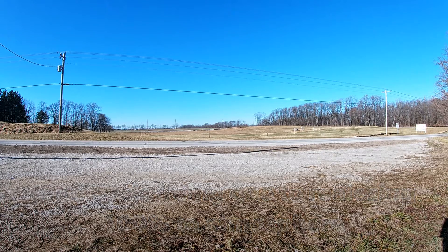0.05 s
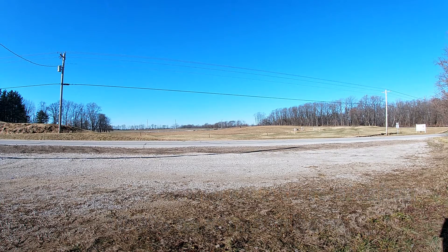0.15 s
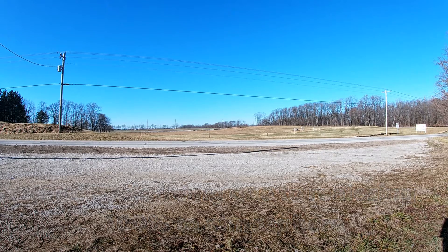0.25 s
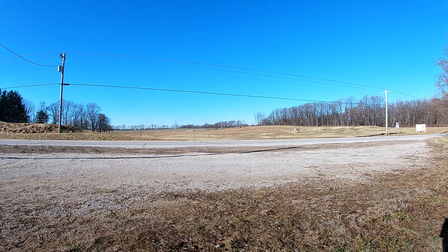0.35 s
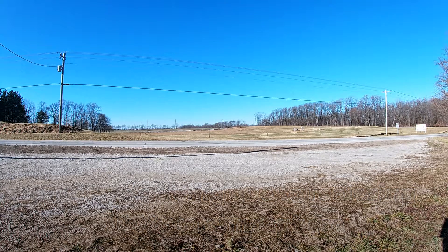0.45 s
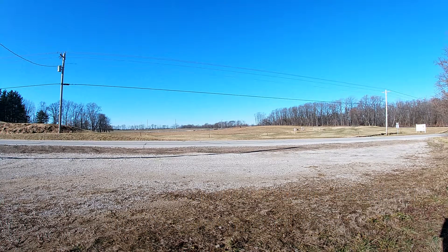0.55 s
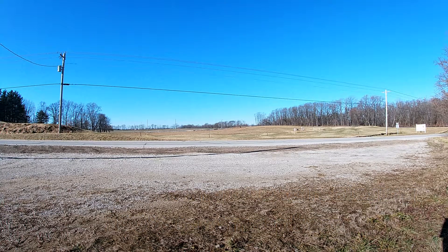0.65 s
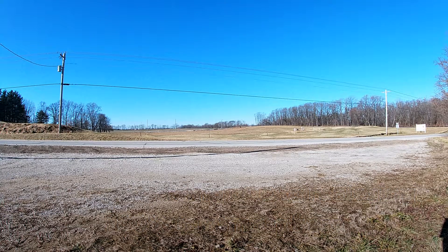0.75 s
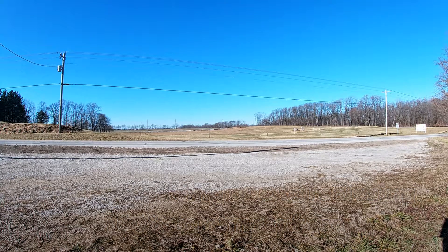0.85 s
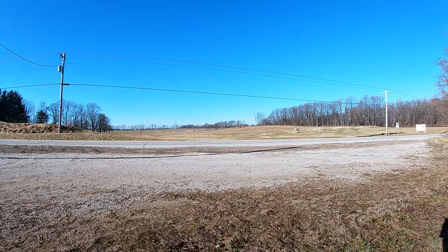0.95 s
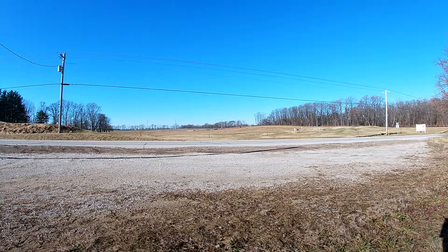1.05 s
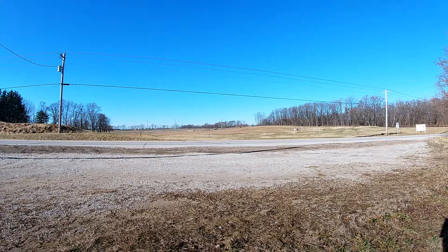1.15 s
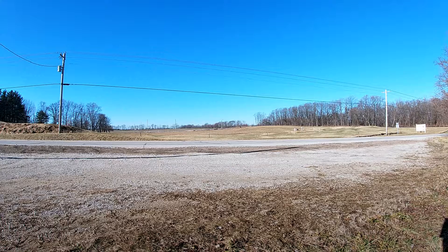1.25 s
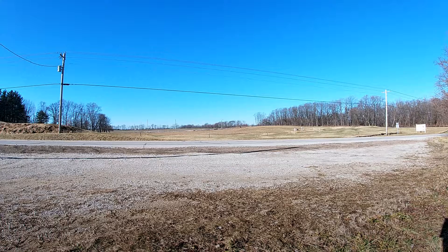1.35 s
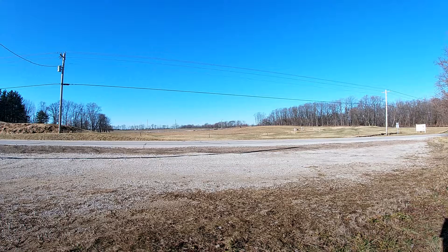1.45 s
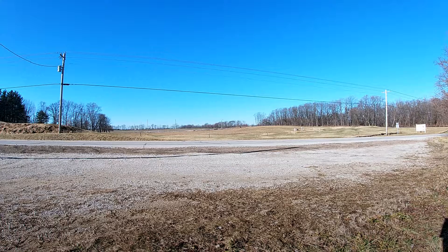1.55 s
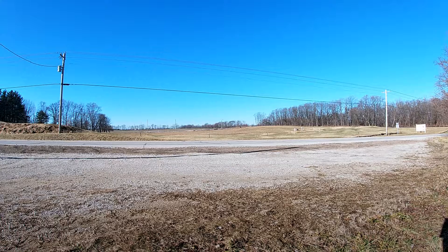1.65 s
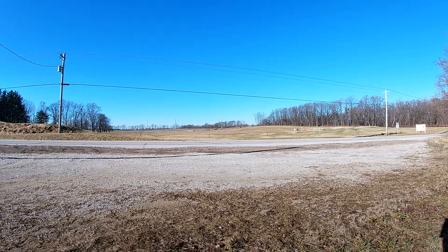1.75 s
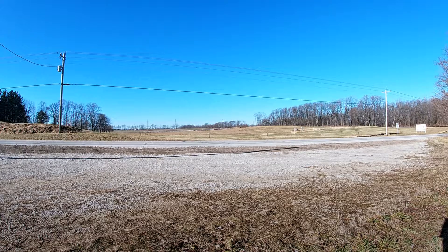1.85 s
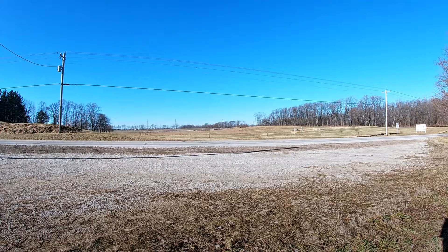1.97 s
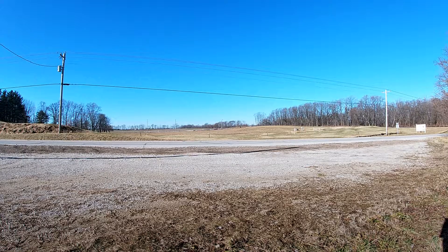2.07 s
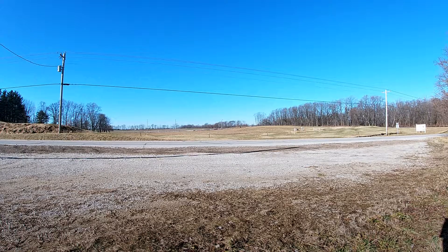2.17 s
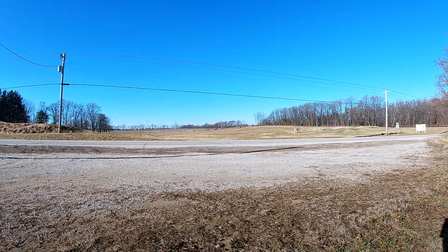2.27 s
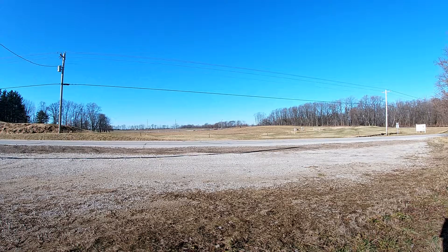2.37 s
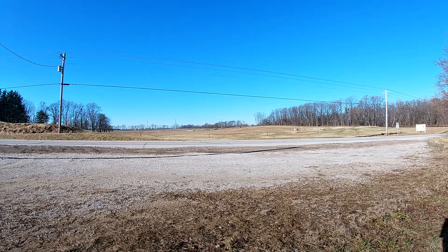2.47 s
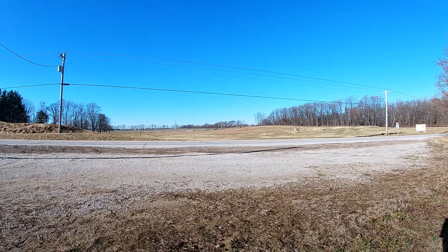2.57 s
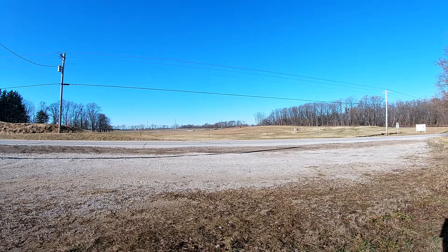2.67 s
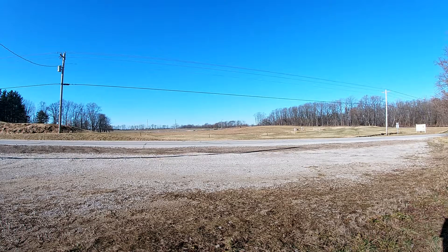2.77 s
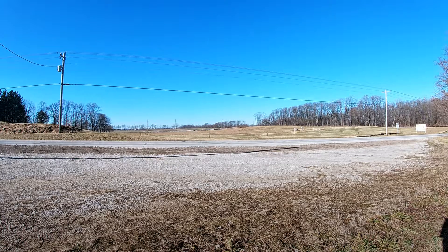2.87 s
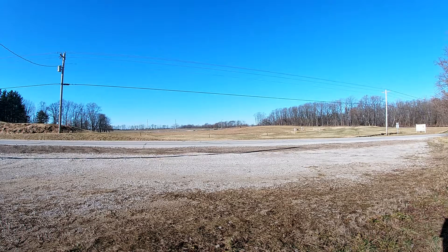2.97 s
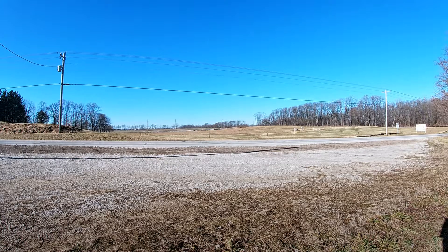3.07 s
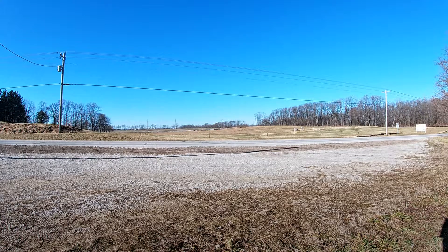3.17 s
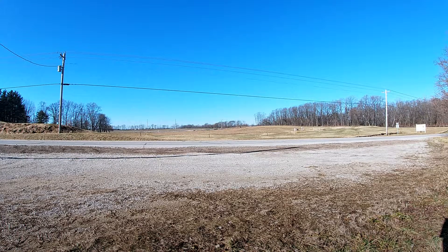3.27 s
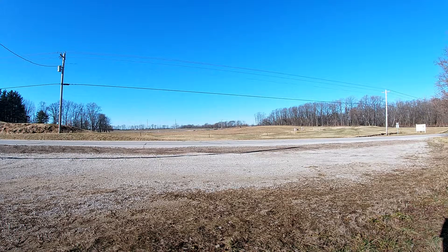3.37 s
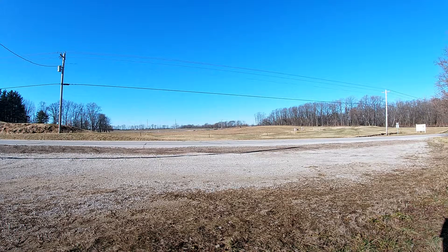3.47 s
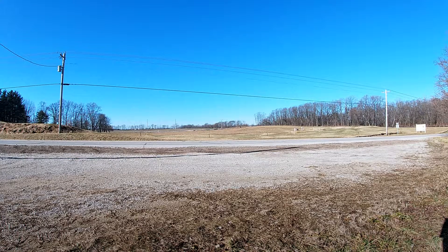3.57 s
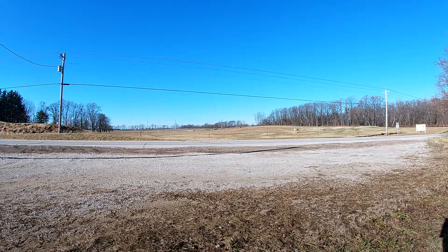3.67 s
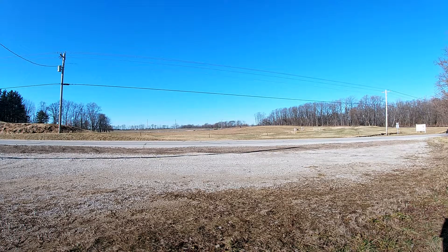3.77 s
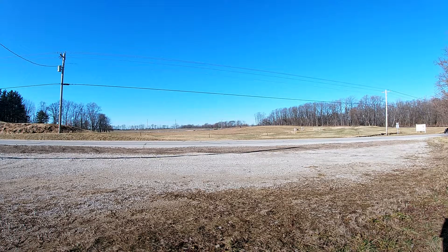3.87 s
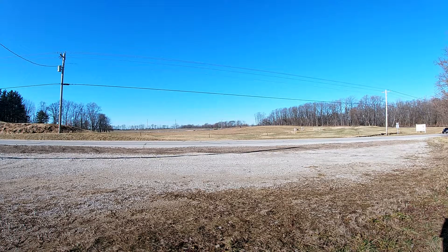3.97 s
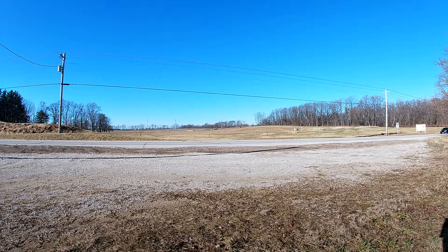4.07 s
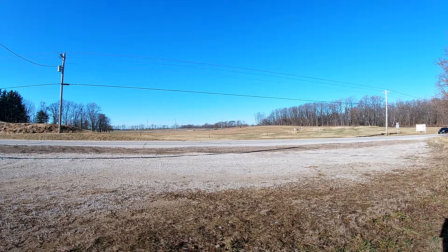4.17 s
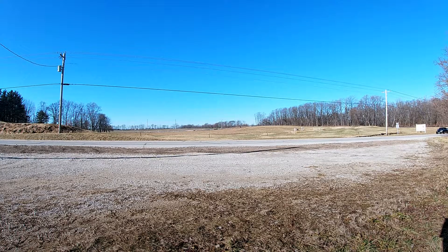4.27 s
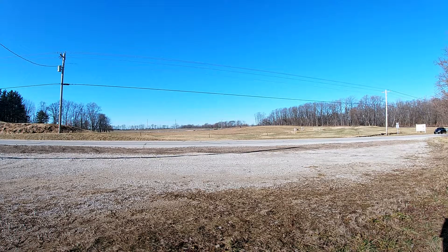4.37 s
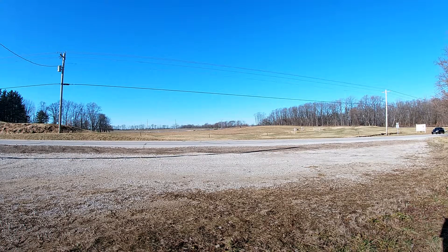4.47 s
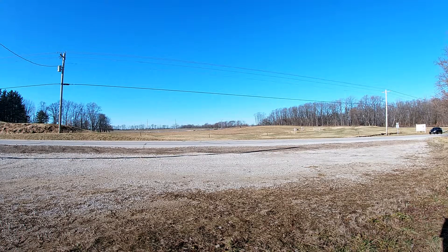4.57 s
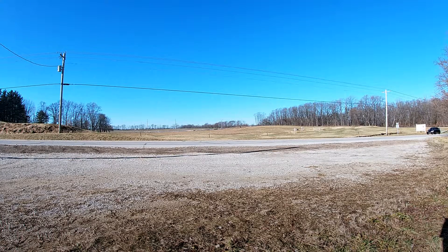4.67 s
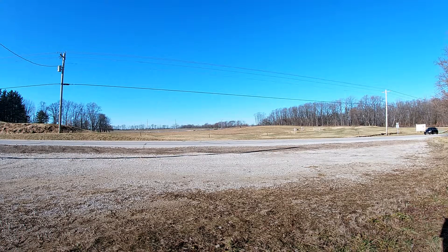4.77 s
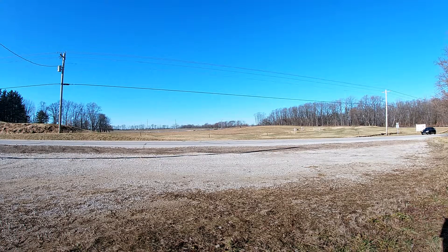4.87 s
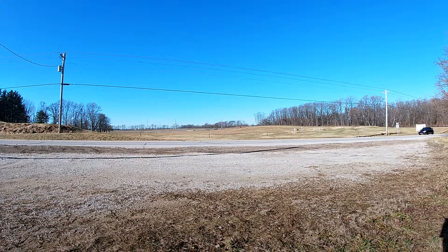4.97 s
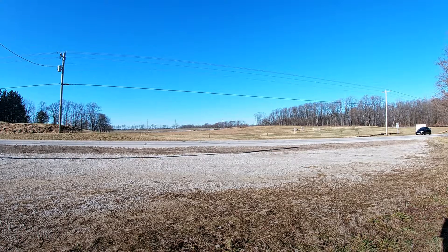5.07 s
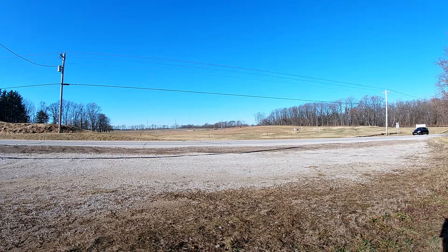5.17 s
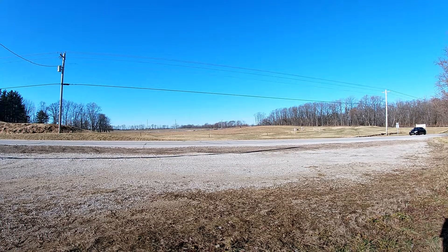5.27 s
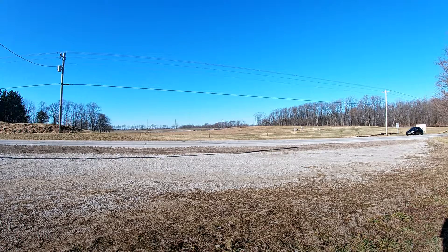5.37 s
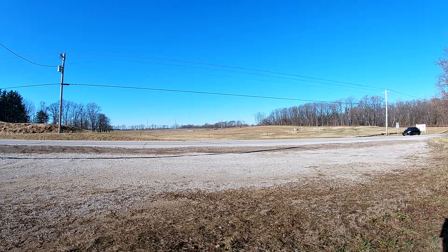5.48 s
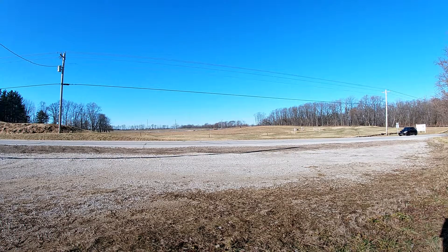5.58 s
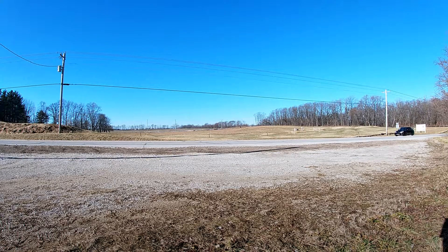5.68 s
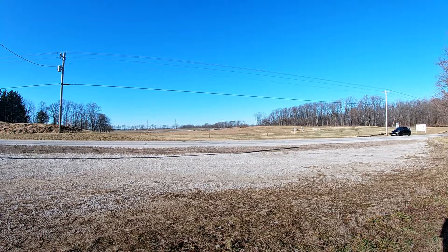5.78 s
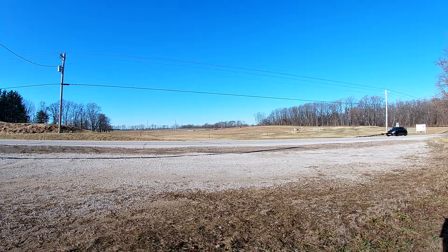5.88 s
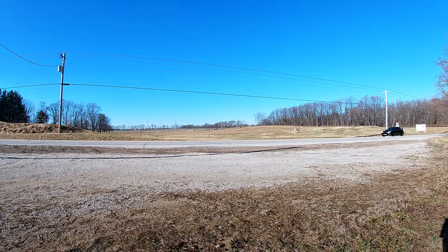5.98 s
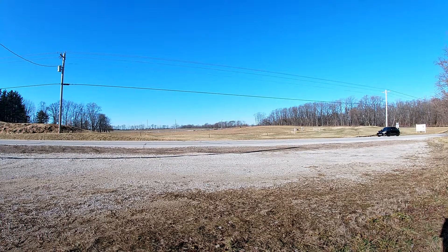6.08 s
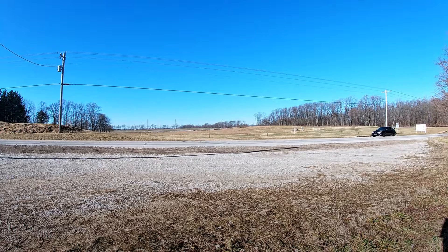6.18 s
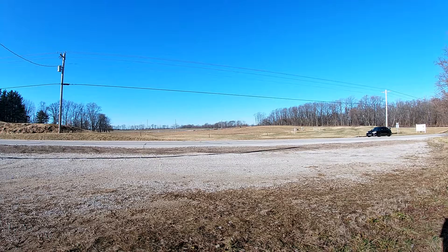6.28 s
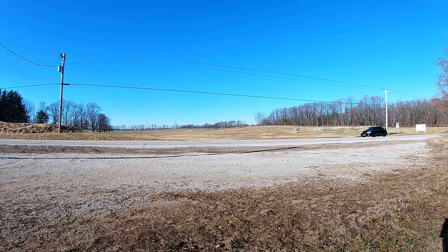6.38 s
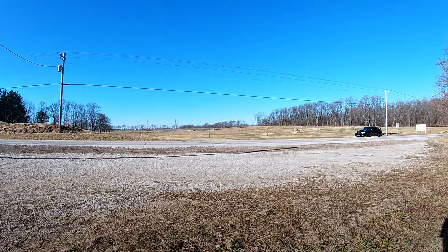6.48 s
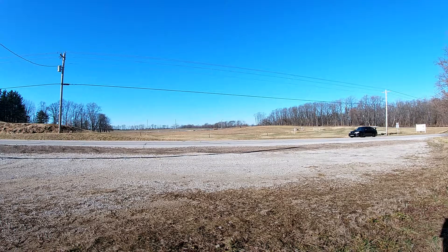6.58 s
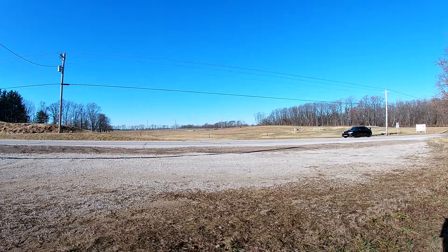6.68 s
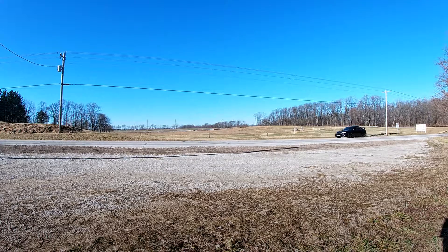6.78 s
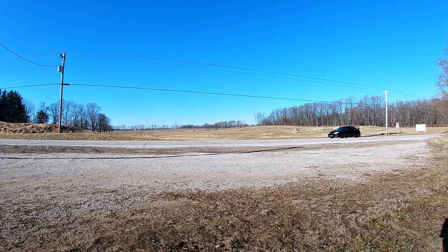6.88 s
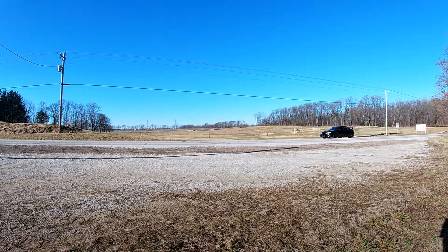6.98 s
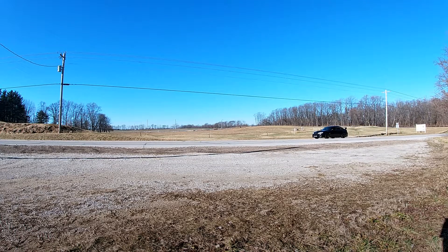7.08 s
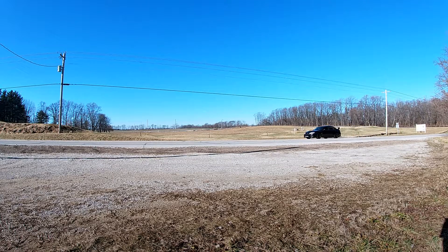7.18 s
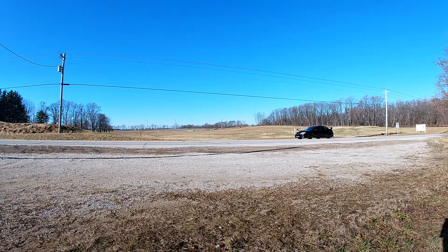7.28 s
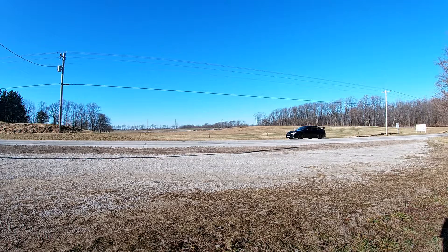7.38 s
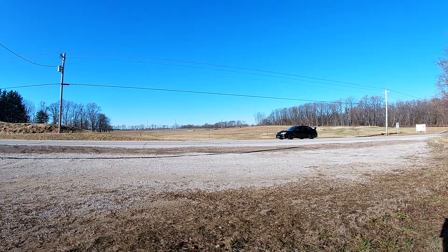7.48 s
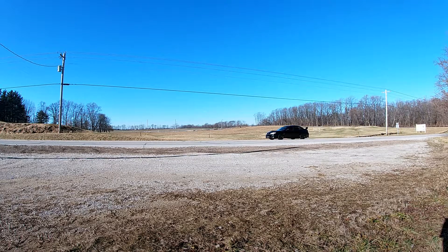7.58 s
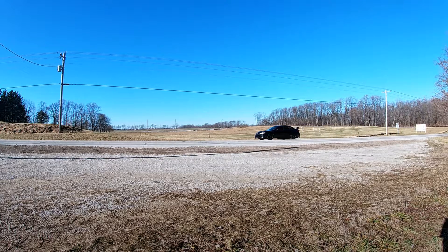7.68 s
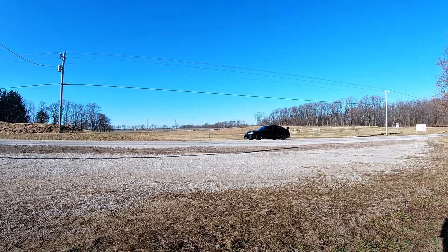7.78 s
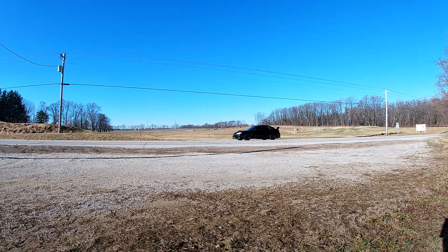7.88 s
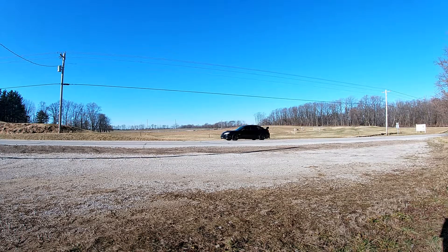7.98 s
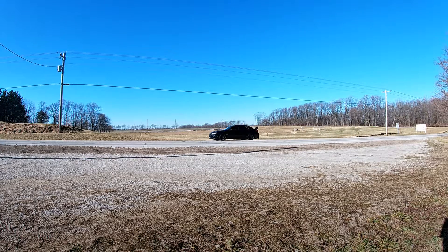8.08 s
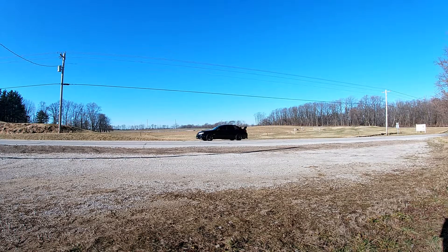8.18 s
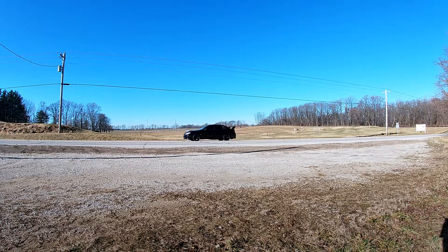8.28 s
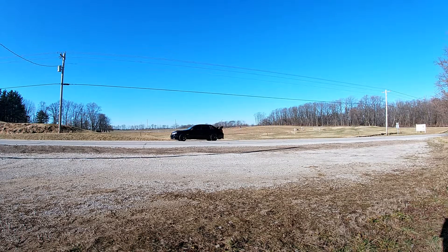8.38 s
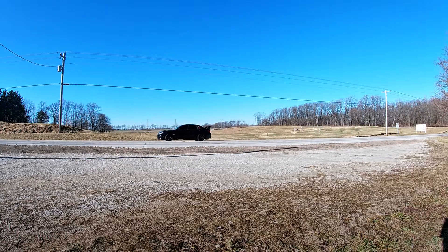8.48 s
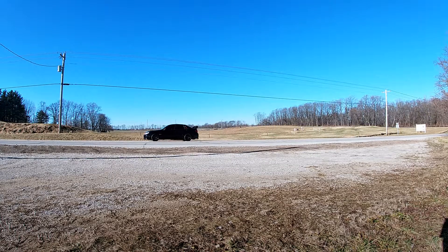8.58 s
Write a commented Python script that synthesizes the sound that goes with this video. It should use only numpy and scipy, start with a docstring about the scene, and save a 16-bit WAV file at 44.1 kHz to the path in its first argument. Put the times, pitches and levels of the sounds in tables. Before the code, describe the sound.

Breezy roadside; a raspy four-cylinder engine draws nearer, whooshing and burbling, blipping its revs, then firing three loud backfires trailed by short hisses.

```python
"""On the verge of a country road, a turbocharged four-cylinder car comes nearer.
Far off it lifts twice with a whoosh and a burble, holds a light throttle, blips down a gear and coasts on.
Three sharp exhaust bangs go off, each trailed by hissing air, over growing tyre and tailpipe noise.
Engine tones and gas puffs follow the crank; bangs and pops are struck resonances with noise;
air, tyres and breeze are coloured noise."""
import sys
import numpy as np
from scipy import signal
from scipy.fft import rfft, irfft, next_fast_len
from scipy.io import wavfile

SR = 44100
rng = np.random.default_rng(int(sys.argv[2]) if len(sys.argv) > 2 else 0)


def unload_wav(signal):
    """Save mono or channel-first audio to the path in sys.argv[1] as 16-bit WAV at rate SR, clipped to [-1, 1]."""
    wavfile.write(
        sys.argv[1],
        SR,
        np.round(np.clip(np.atleast_2d(signal).T, -1, 1) * 32767).astype(np.int16),
    )


N = 381024
TIME = np.arange(N) / SR
HZ = np.maximum(np.fft.rfftfreq(N, 1 / SR), 1)

# All levels are relative: later mixing steps can shift them.
# Breeze, low and lumpy: (time [s], level [dB])
BUFFETING = [(0,-63),(.6,-42.5),(1.0,-50.5),(1.7,-43.5),(2.2,-51.5),(3.9,-52),(4.7,-40.5),(5.8,-38),(6.2,-42),(6.6,-38),(7.2,-36.5),(7.8,-37.5),(8.64,-39.5)]
# Single gusts that thud on the microphone: (time [s], level [dB])
GUSTS = [(.63,-32),(1.59,-36),(1.735,-24),(4.87,-17.5),(5.25,-25),(5.48,-29.5),(6.35,-23.5),(7.17,-35.5),(8.15,-20),(8.49,-28)]
# Colour of the breeze and of the puffs under pops: (frequency [Hz], density [dB per Hz])
RUMBLE_COLOUR = [(10,-12),(22,-4.5),(40,-6.5),(70,-3.5),(110,-5),(180,-9),(300,-28.5)]
# Colour of the faint open-air hush: (frequency [Hz], density [dB per Hz])
HUSH_COLOUR = [(350,9),(700,0.5),(1500,-6),(3000,-20.5),(6000,-33.5),(7500,-40.5)]
# Tyres and gas flow: (time [s], tyre level [dB], tailpipe hiss level [dB])
ROAD_LEVELS = [(0,-49.5,-81),(1.5,-50,-78),(3,-44.5,-65.5),(3.9,-41.5,-55.5),(4.5,-40,-56.5),(5.3,-40,-56),(6.75,-40.5,-52),(7.4,-35.5,-48),(7.9,-41.5,-52.5),(8.25,-40,-48.5),(8.64,-37,-48.5)]
# Colour of the tyre roar: (frequency [Hz], density [dB per Hz])
TYRE_COLOUR = [(250,8),(325,15),(375,4.5),(450,10.5),(545,9),(690,-23.5),(835,-4.5),(945,-9.5),(1200,-6),(1450,-7.5),(1850,-8),(2200,-15),(3200,-22.5),(6000,-53.5)]
# Colour of the intake roar: (frequency [Hz], density [dB per Hz])
INTAKE_COLOUR = [(720,-23),(835,1),(950,-12.5),(1110,0.5),(1280,-3.5),(1420,-11),(1700,-23)]
# Loudness of the intake roar: (time [s], level [dB])
INTAKE_LEVEL = [(0,-66),(1.65,-64),(1.85,-47),(2.2,-51.5),(3,-64.5),(4,-50.5),(4.6,-48.5),(6,-51.5),(6.7,-55.5),(7.3,-47),(8,-58.5),(8.64,-52)]

# Blow-off valve openings: (time [s], level [dB], held open [s], fall [dB/s], first treble corner [Hz])
BLOW_OFFS = [(.235,-48.5,0.18,48,4020),(1.712,-39.5,0.11,26,3620),(5.468,-27.5,0.053,83,6010),(6.32,-30,0.11,111,6960),(7.476,-32,0.17,110,6330)]
# Whooshes back off the trees: (time [s], level [dB], rise [s], half-life [s], first treble corner [Hz])
WASHES = [(.34,-33,0.059,0.18,3750),(1.955,-30,0.045,0.22,3170)]
# Colour of the escaping boost air: (frequency [Hz], density [dB per Hz])
AIR_COLOUR = [(220,-10.5),(320,12.5),(385,3),(480,13),(570,7.5),(680,2.5),(900,-5),(1200,1),(1700,-6),(2400,-11.5),(3600,-7),(5000,-11),(6400,-15),(7600,-23),(10000,-27.5),(11500,-37),(14000,-34.5)]

# Dull pops deep in the exhaust: (time [s], level [dB], pitch [Hz])
POPS = [(0.241,-9,213),(.268,-16.5,164),(0.328,-12.5,158.3),(0.409,-15.5,160.3),(0.674,-15.5,179),(1.059,-12,174.4),(1.084,-12,138),(1.094,-14.5,251),(1.314,-24.5,70.7),(1.723,-23,422),(1.738,-10.5,307),(1.755,-28.5,129.4),(1.79,-15.5,193.3),(1.809,-20,121.3),(1.83,-21,150.4),(1.869,-22,143.4),(1.928,-19.5,197),(1.957,-18.5,173),(1.982,-17,81.3),(3.425,-7.5,263),(4.788,-17,102)]
# Bangs, two faint then three sharp: (time [s], crack level [dB], crack length [s],
# thump level [dB], thump pitch [Hz], squeal level [dB], squeal pitch [Hz])
BANGS = [(0.233,-48,0.0093,-20,523,-46.5,1580),(1.716,-42.5,0.031,-20.5,474,-37,1411),(5.47,-28,0.044,-5,525,-42.5,3450),(6.325,-24,0.022,-4.5,465.5,-38,3600),(7.49,-15,0.027,-7.5,562,-35,4145)]
# Colour of the crack of a bang: (frequency [Hz], density [dB per Hz])
CRACK_COLOUR = [(150,12),(300,13),(800,4),(970,-1),(1300,6.5),(2100,-10),(3100,-8.5),(3600,-6),(4000,-10.5),(4800,-13.5),(6400,-17),(7700,-32),(10000,-33.5),(12000,-50.5),(14000,-32.5)]
# Silencer boom under a bang: (frequency [Hz], level [dB], time to fall 60 dB [s])
SILENCER = [(171,-14,0.02),(238.4,4,0.055),(295,-10,0.2),(796,-14.5,0.07),(1107,-26.5,0.1)]
# Short spits of gas after the bangs: (time [s], level [dB])
SPITS = [(5.649,-28.5),(6.427,-27),(6.568,-33.5),(7.609,-36),(7.667,-36.5),(7.811,-35.5)]
# Whistling gas: (time [s], length [s], level [dB], first pitch [Hz], last pitch [Hz])
WHISTLES = [(5.498,0.1,-36.5,1260,1187),(5.661,0.22,-58.5,3377,3300),(6.321,.018,-28,3550,3610),(6.336,0.042,-29.5,1240,1160),(6.38,.075,-53.5,3616,3550),(6.403,0.089,-44.5,1900,1866),(7.547,0.032,-36,1637,1385),(8.031,.45,-57.5,2840,2726)]

# Engine speed: (time [s], four-stroke cycles per second [Hz])
REVS = [(0,22.6),(.4,21.7),(1.1,20.9),(2.2,20.4),(3.3,20.7),(3.8,20.1),(4.14,17.5),(4.2,18.2),(4.26,20.3),(4.3,22.8),(4.35,24.8),(4.42,26.4),(4.54,28.4),(4.62,27.6),(4.72,27.1),(4.84,28.2),(5.0,26.9),(5.12,27.3),(5.3,26.6),(6.1,25.3),(6.7,24.2),(7.0,24.2),(7.17,23.4),(7.3,23.5),(7.5,22.7),(7.75,22.7),(8.0,22.2),(8.12,22.3),(8.64,21.1)]
# Exhaust loudness, which drives note, burble, rasp and bark: (time [s], level [dB])
EXHAUST_LEVEL = [(0,-51.5),(.4,-41.5),(1.0,-44),(1.5,-48),(2.15,-50.5),(2.9,-45.5),(3.4,-42),(3.5,-43.5),(3.8,-49.5),(4.1,-41.5),(4.38,-34),(4.55,-37),(4.8,-31.5),(5.3,-31.5),(5.75,-32.5),(6.15,-30),(6.8,-32),(7.35,-27.5),(7.9,-29),(8.64,-25)]
# Strongest tones of the note: (order [multiples of the cycle rate])
LEADING_ORDERS = (3, 4, 5, 7, 8, 9, 10, 11, 12)
# Strength of each leading order while coasting: (level [dB])
COAST_ORDERS_DB = [-13, -6.5, -9.5, -8, -4.5, -4.5, -6.5, -12, -1.5]
# The same on a light throttle: (level [dB])
THROTTLE_ORDERS_DB = [-17.5, -13, -25.5, 1, 1, 6, -4, 2.5, 8.5]
# The same on the overrun, with the throttle shut: (level [dB])
OVERRUN_ORDERS_DB = [-15.5, 1.5, -11, -20.5, -0.5, -3.5, -19.5, -12.5, -11.5]
# Timed swells of single engine orders: (middle [s], half length [s], order [-], level [dB])
ORDER_SWELLS = [(.03,.08,9,-39),(1.5,.2,9,-40),(3.25,.15,12,-38),(3.7,.18,10,-36),(4.1,.17,7,-34),(4.13,.15,11,-37),(4.12,.07,16,-40),(4.23,.05,11,-35),(4.25,.06,7,-36),(4.33,.04,9,-34),(4.37,.08,12,-29),(4.43,.07,5,-31),(4.42,.04,8,-33),(4.7,.13,11,-32),(4.8,.14,4,-31),(4.76,.08,7,-30),(4.79,.16,19,-34),(5.15,.25,19,-34),(5.15,.12,7,-29),(5.43,.1,7,-25),(5.9,.3,7,-23),(5.9,.25,21,-39),(5.9,.27,19,-39),(6.03,.16,6,-31),(6.05,.12,8,-22),(6.12,.17,11,-32),(6.55,.17,23,-37),(6.57,.12,4,-35),(6.62,.12,8,-32),(6.6,.12,9,-35),(7.1,.15,23,-36),(7.17,.22,19,-34),(7.42,.13,9,-20),(7.8,.13,23,-35),(7.9,.25,8,-20),(8.15,.11,23,-33),(8.25,.4,5,-29),(8.1,.15,13,-35),(8.62,.22,4,-24)]
# Spells in which burble and rasp grow louder or softer:
# (middle [s], half length [s], burble change [dB], rasp change [dB])
EXHAUST_SWELLS = [(0.496,0.2,-5,9.5),(0.73,0.063,-3,2),(1.798,0.094,8,18),(4.13,0.087,2.5,-4.5),(4.364,0.077,8.5,3),(4.825,0.17,4,1),(6.084,0.17,3.5,-2.5),(7.06,0.3,-7.5,2.5),(7.629,0.068,3,4),(8.473,0.027,4.5,8.5)]
# Weakened beats of the exhaust: (middle [s], half length [s], level change [dB])
MISSES = [(0.893,0.064,-9),(1.272,0.1,-2),(4.191,0.015,-2),(4.966,0.02,-5.5),(6.77,0.039,-3.5)]
# Colour of the burble: (frequency [Hz], density [dB per Hz])
BURBLE_COLOUR = [(45,-28),(80,-11.5),(120,-1),(190,8),(250,4.5),(315,5),(360,-19.5),(450,-23)]
# Colour of the rasp: (frequency [Hz], density [dB per Hz])
RASP_COLOUR = [(300,-27),(380,-3),(450,1.5),(540,6),(590,-6),(660,-19.5),(800,-43),(970,-36),(1200,-39.5),(1800,-42),(3000,-71.5)]
# Colour of the bark, the tailpipe's next resonance: (frequency [Hz], density [dB per Hz])
BARK_COLOUR = [(620,-20),(700,-5.5),(780,4),(880,1.5),(960,-33),(1100,-23)]
# Colour of the tailpipe hiss: (frequency [Hz], density [dB per Hz])
HISS_COLOUR = [(700,-12.5),(980,-1.5),(1220,3),(1450,-1),(2100,-3),(2800,-3),(3600,0),(4500,-6),(5500,-11),(6700,-17.5),(7600,-26),(9500,-33),(12000,-46)]
# Narrow fixed resonances from surfaces near the microphone: (frequency [Hz], gain [dB])
FIXED_RINGS = [(1201,2),(1290,-3.5),(1614,2),(1840,3.5),(2380,7),(2780,2),(3350,4),(3883,1.5),(4147,-1.5),(5028,1)]
# Echoes off field and trees: (delay [s], level [dB])
ECHOES = [(0.018,-8.5),(0.029,-37),(0.092,-24),(0.171,-21)]

HUSH_DB = -70.5
GUST_S = 0.051
PIPE_HZ = 343   # spacing of the tailpipe resonances
CUTOFF_HZ = 14000
VALVE_ATTACK_S, VALVE_DULLS_OCT_PER_S = .011, 0.89   # the jet dulls as the boost drains
WASH_DULLS_OCT_PER_S = 0.77
WASH_TILT_DB_PER_OCT = -0.5   # the trees return more body than treble
POP_RUMBLE_DB, POP_RUMBLE_S = -26, 0.048   # level relative to the pop table
SPIT_S, WHISTLE_WIDTH_HZ = 0.015, 45
NEAR_DB = -29   # exhaust loudness at which the next three levels hold
# Each has a level and the share of the exhaust's swing that it follows
BURBLE_DB, BURBLE_FOLLOWS = -28.5, 0.6
RASP_DB, RASP_FOLLOWS = -36.5, 0.91
BARK_DB, BARK_FOLLOWS = -51.5, 0.82
SIDE_ON_S, SIDE_ON_TURN_S, SIDE_ON_DB = 6.24, 0.75, 6.5   # the bark grows as the car turns side-on
CRUISE_FROM_S, CRUISE_TO_S, PEDAL_S = 2.15, 3.46, .1   # light throttle; time to move the pedal
OVERRUN_S, THROTTLE_CLOSE_S = 4.57, .3
PIPE_SMEAR = .008   # spreading of each beat by the pipe [turns per order squared]
RASP_ECHO_S, RASP_ECHO_DB = .075, -6.5
FALTER_DB, FALTER_S = -9.5, 0.088   # scale of the dip; its slow onset keeps it shallower
ORDER_SWELLS_DB = 0.5   # shift of all the order swells


def from_db(db):
    """Turn decibels into gain."""
    return 10 ** (np.asarray(db) / 20)


def rms_one(x):
    """Scale a sound to unit power."""
    return x / np.sqrt(np.mean(x ** 2) + 1e-20)


def in_time(rows):
    """Draw each column of a timed table at every sample."""
    s, *columns = np.transpose(rows)
    return [np.interp(TIME, s, c) for c in columns]


def gain_at(spectrum, hz):
    """Gain of a spectrum, falling 20 dB per octave past its ends."""
    f, db = np.transpose(spectrum)
    octaves_outside = np.abs(np.log2(hz / np.clip(hz, f[0], f[-1])))
    return from_db(np.interp(np.log(hz), np.log(f), db) - 20 * octaves_outside)


def drift(rate_hz):
    """Smooth random wandering with a spread of 1, drawn every 40 samples."""
    r = np.exp(-80 * np.pi * rate_hz / SR)
    # the first 2000 points only settle the filter
    slow = signal.lfilter([1], [1, -2 * r, r * r], rng.standard_normal(N // 40 + 2002))[2000:]
    return np.interp(np.arange(N) / 40, np.arange(len(slow)), rms_one(slow))


def coloured(x, spectrum, reflection=0):
    """Shape a sound; an open pipe end sends it back inverted and makes odd resonances."""
    pipe = 1 / (1 + np.clip(reflection, 0, .8) * np.exp(-2j * np.pi * HZ / PIPE_HZ))
    return rms_one(irfft(rfft(x) * gain_at(spectrum, HZ) * pipe, N))


def noise(spectrum, reflection=0):
    """Turbulence with a given colour."""
    return coloured(rng.standard_normal(N), spectrum, reflection)


def ramp(middle_s, length_s):
    """A change from 0 to 1 around a moment."""
    return np.clip((TIME - middle_s) / length_s + .5, 0, 1)


def bump(middle_s, half_length_s):
    """A smooth bell-shaped spell that peaks at 1."""
    return np.exp(-((TIME - middle_s) / half_length_s) ** 2)


def burst(s, length, rise):
    """Envelope of a puff of gas: quick rise, short hold, steep fall."""
    age = np.maximum(TIME - s, 0)
    return (1 - np.exp(-age / rise)) / (1 + (age / length) ** 4)


def ring(t, hz, t60, rise=0.0054):
    """A struck resonance that builds up quickly and dies away."""
    return np.sin(2 * np.pi * hz * t) * from_db(-60 * t / t60) * (1 - np.exp(-t / rise))


def add(out, s, sound):
    """Mix a sound in at its time."""
    i = max(int(s * SR), 0)
    out[i:i + len(sound)] += sound[:N - i]


def delayed(x, delay):
    """The same sound arriving later; the delay may change with time."""
    return np.interp(TIME - delay, TIME, x, left=0)


def hush():
    """Faint, steady open-air noise."""
    return from_db(HUSH_DB) * noise(HUSH_COLOUR)


def breeze():
    """Moving air buffets in a low, lumpy rumble, with single gusts."""
    buffeting = from_db(in_time(BUFFETING)[0] + 9.0 + 0.9 * drift(30))
    gusts = sum(from_db(db - 2.5) * burst(s, GUST_S, rise=0.0094) for s, db in GUSTS)
    return noise(RUMBLE_COLOUR) * (buffeting + gusts)


def tyres():
    """Tyre roar: coloured noise that wavers slowly."""
    return noise(TYRE_COLOUR, reflection=0.034) * from_db(in_time(ROAD_LEVELS)[0] + 2.3 * drift(1.9))


def intake():
    """Air drawn through the intake roars in two broad resonances."""
    return noise(INTAKE_COLOUR) * from_db(in_time(INTAKE_LEVEL)[0] + 1.4 * drift(11))


def wash():
    """Gain and treble corner of the echo off the trees: a swell, a quick fall, then a lingering tail."""
    gain, corner_hz = 0, np.full(N, WASHES[0][-1], float)
    for s, db, rise, half_life, hz in WASHES:
        age = np.maximum(TIME - s, 0)
        gain = gain + from_db(db) * (1 - np.exp(-age / rise)) / (1 + (age / half_life) ** 1.28)
        corner_hz = np.where(age > 0, hz * 2 ** (-WASH_DULLS_OCT_PER_S * age), corner_hz)
    return gain, corner_hz


def valve():
    """Gain and treble corner of the jet: it opens fast, holds, then drains and dulls."""
    gain, corner_hz = 0, np.full(N, BLOW_OFFS[0][-1], float)
    for s, db, hold, fall_db_per_s, hz in BLOW_OFFS:
        age = np.maximum(TIME - s, 0)
        falling_db = db - fall_db_per_s * np.maximum(age - hold, 0)
        gain = gain + from_db(falling_db) * (1 - np.exp(-age / VALVE_ATTACK_S))
        corner_hz = np.where(age > 0, hz * 2 ** (-VALVE_DULLS_OCT_PER_S * age), corner_hz)
    return gain, corner_hz


def blow_off(flutter_db, patchy_db):
    """A jet of boost air flutters and churns band by band, with a smooth wash off the trees; both dull."""
    (jet_gain, jet_hz), (wash_gain, wash_hz) = valve(), wash()
    jet_gain = jet_gain * from_db(flutter_db * drift(32))
    air, out = rfft(noise(AIR_COLOUR, reflection=0.15)), 0
    centres = np.geomspace(600, 12000, num=8)
    for hz, share in zip(centres, np.eye(len(centres))):
        # neighbouring bands cross-fade into each other
        band = irfft(air * np.interp(np.log(HZ), np.log(centres), share), N)
        churning = jet_gain * from_db(patchy_db * drift(45))
        tilted = wash_gain * from_db(WASH_TILT_DB_PER_OCT * np.log2(hz / 2000))
        jet_power = churning ** 2 / (1 + (hz / jet_hz) ** 5)
        wash_power = tilted ** 2 / (1 + (hz / wash_hz) ** 6)
        out = out + band * np.sqrt(jet_power + wash_power)
    return out * from_db(-2.0)


def squeal(hz, width_hz):
    """Gas whistling roughly over an edge, at a steady or gliding pitch."""
    angle = 2 * np.pi * np.cumsum(hz * np.ones(N)) / SR
    return drift(width_hz) * np.sin(angle) + drift(width_hz) * np.cos(angle)


def whistles(rise):
    """Escaping gas whistles in short chirps and faint whines that glide in pitch."""
    out = 0
    for s, length, db, first_hz, last_hz in WHISTLES:
        pitch_hz = np.interp(TIME, [s, s + length], [first_hz, last_hz])
        out = out + from_db(db) * burst(s, length, rise) * squeal(pitch_hz, WHISTLE_WIDTH_HZ)
    return out


def pops(cycles):
    """Unburnt fuel lights deep in the exhaust, booms for a few cycles and pushes out a low puff."""
    out, t, rumble = np.zeros(N), TIME[:SR // 4], noise(RUMBLE_COLOUR)
    for s, db, hz in POPS:
        add(out, s, from_db(db + 7.0) * ring(t, hz, cycles / hz, rise=0.0046))
        out += rumble * from_db(db + POP_RUMBLE_DB) * burst(s, POP_RUMBLE_S, rise=0.0071)
    return out


def bangs(rise, thump_lag, thump_t60):
    """Fuel lights at the tailpipe: a squealing rush of gas, then pipe and silencer boom; spits follow."""
    out, t, blast = np.zeros(N), TIME[:SR // 4], noise(CRACK_COLOUR, reflection=0.03)
    boom = sum(from_db(db) * ring(t, hz, t60) for hz, db, t60 in SILENCER)
    for s, crack_db, length, thump_db, hz, squeal_db, squeal_hz in BANGS:
        rush = from_db(crack_db) * blast + from_db(squeal_db) * squeal(squeal_hz, width_hz=280)
        out += rush * burst(s, length, rise)
        add(out, s + thump_lag, from_db(thump_db) * (ring(t, hz, thump_t60) + boom))
    spits = blast * sum(from_db(db) * burst(s, SPIT_S, rise) for s, db in SPITS)
    return out + spits


def order_tone(turn, k):
    """One engine order at unit power; all are locked to the crank, so they throb once a cycle."""
    return np.sqrt(2) * np.cos(2 * np.pi * (k * turn + PIPE_SMEAR * k ** 2))


def exhaust_note(turn, waver_db):
    """The strongest engine orders as wavering tones; the throttle sets their mix."""
    overrun, out = ramp(OVERRUN_S, THROTTLE_CLOSE_S), 0
    cruise = ramp(CRUISE_FROM_S, PEDAL_S) - ramp(CRUISE_TO_S, PEDAL_S)
    orders = zip(LEADING_ORDERS, COAST_ORDERS_DB, THROTTLE_ORDERS_DB, OVERRUN_ORDERS_DB)
    for k, coast_db, open_db, shut_db in orders:
        mix_db = coast_db + (open_db - coast_db) * cruise + (shut_db - coast_db) * overrun
        waver = waver_db * (1 - cruise / 2) * drift(7)   # steadier on the throttle
        out = out + from_db(mix_db + waver) * order_tone(turn, k)
    return out


def order_swells(turn, waver_db):
    """Single engine orders swell for timed spells, several at once in places; high orders flutter more."""
    flutter_db = waver_db * drift(18)
    return sum(from_db(db + ORDER_SWELLS_DB + flutter_db * k / 10) * bump(s, length) * order_tone(turn, k)
               for s, length, k, db in ORDER_SWELLS)


def falter():
    """Decibels by which the note weakens for a moment after each bang."""
    return FALTER_DB * sum(burst(s, FALTER_S, rise=0.11) for s, *_ in BANGS)


def firings(turn, uneven_db, lag):
    """Four pulses a cycle; unequal headers delay one bank, and no two burns are alike."""
    cylinder_db, bank = np.array([-4.0, 0.0, -1.5, 2.5]), np.array([0, 0, 1, 1])
    k = np.arange(int(turn[-1]) * 4)
    cylinder = k % len(bank)
    # the lag is in cycles
    at = np.searchsorted(turn, k / len(bank) + lag * bank[cylinder])
    pulses = np.zeros(N)
    strength_db = cylinder_db[cylinder] + uneven_db * rng.standard_normal(len(k))
    pulses[np.minimum(at, N - 1)] = from_db(strength_db)
    return pulses


def puffs(pulses, length):
    """Each firing lets out a short puff of turbulent gas."""
    gate = signal.lfilter([1], [1, -np.exp(-1 / (length * SR))], pulses)
    return rms_one(gate * rng.standard_normal(N))


def exhaust_swells():
    """Decibels by which the burble and the rasp grow louder or softer for short spells."""
    return sum(np.outer([burble_db, rasp_db], bump(s, length))
               for s, length, burble_db, rasp_db in EXHAUST_SWELLS)


def misses():
    """Gain of the exhaust as it weakens for a few firings."""
    return from_db(sum(db * bump(s, length) for s, length, db in MISSES))


def beating(x):
    """A sound and its echo off the field; their gliding lines cancel and add in turn."""
    return rms_one(x + from_db(RASP_ECHO_DB) * delayed(x, RASP_ECHO_S))


def engine():
    """Note, burble, rasp, bark and hiss of the exhaust, all locked to the crank."""
    revs, exhaust_db = in_time(REVS)[0], in_time(EXHAUST_LEVEL)[0]
    swing_db = exhaust_db - NEAR_DB
    burble_change_db, rasp_change_db = exhaust_swells()
    turn = np.cumsum(revs * (1 + .0015 * drift(12))) / SR   # cycles so far
    pulses = firings(turn, uneven_db=1.8, lag=.035)
    burble_pulses = firings(turn, uneven_db=2.0, lag=0.026)

    note = exhaust_note(turn, waver_db=2.2) * from_db(exhaust_db) + order_swells(turn, waver_db=1.0)
    note = note * from_db(falter())
    burble = coloured(rms_one(burble_pulses) + .5 * puffs(pulses, length=0.018), BURBLE_COLOUR)
    rasp = coloured(rms_one(pulses) + .45 * puffs(pulses, length=.015), RASP_COLOUR)
    bark = coloured(puffs(pulses, length=0.017) + 0.083 * rms_one(pulses), BARK_COLOUR)
    hiss_gas = puffs(pulses, length=0.034) + 0.12 * rms_one(pulses)
    hiss = coloured(hiss_gas, HISS_COLOUR, reflection=0.048)

    burble_db = BURBLE_DB + BURBLE_FOLLOWS * swing_db + burble_change_db
    rasp_db = RASP_DB + RASP_FOLLOWS * swing_db + rasp_change_db
    bark_db = BARK_DB + BARK_FOLLOWS * swing_db + SIDE_ON_DB * ramp(SIDE_ON_S, SIDE_ON_TURN_S)
    hiss_db = in_time(ROAD_LEVELS)[1] - 4.5
    return (note + burble * from_db(burble_db) + beating(rasp) * from_db(rasp_db)
            + bark * from_db(bark_db) + hiss * from_db(hiss_db))


def fixed_rings(x, width_hz):
    """Narrow fixed resonances from surfaces near the microphone colour the car's sound."""
    size = next_fast_len(N + SR // 4)   # spare room for the rings to die away
    freqs = np.fft.rfftfreq(size, 1 / SR)
    rings = 1 + sum((from_db(db) - 1) / (1 + 2j * (freqs - hz) / width_hz) for hz, db in FIXED_RINGS)
    return irfft(rfft(x, size) * rings, size)[:N]


def outdoors(x, dull_hz):
    """Field and trees send back a few dull echoes."""
    dull = signal.sosfilt(signal.butter(1, dull_hz, fs=SR, output="sos"), x)
    return x + sum(from_db(db) * delayed(dull, s) for s, db in ECHOES)


def close_reflections(x, share, slide, count=14):
    """Things near the microphone comb the treble; the paths slide as the car's bearing changes."""
    bearing = (TIME / TIME[-1]) ** 3   # 0 to 1, fastest at the end
    treble = signal.sosfilt(signal.butter(2, 900, "high", fs=SR, output="sos"), x)
    lags_s, slides_s = rng.uniform(.002, .014, count), rng.normal(0, slide, count)
    signs = rng.choice([-1, 1], count)
    back = sum(sign * delayed(treble, lag + move * bearing)
               for lag, move, sign in zip(lags_s, slides_s, signs))
    return x + share / np.sqrt(count) * back


def scene():
    """The breeze, the car and its echoes together."""
    background = tyres() + breeze() + hush()
    explosions = pops(cycles=6.3) + bangs(rise=0.0036, thump_lag=.011, thump_t60=0.082)
    backfire = outdoors(explosions, dull_hz=2500)
    gas = engine() * misses() + intake() + blow_off(flutter_db=1.5, patchy_db=2.2) + backfire
    car = fixed_rings(gas, width_hz=65) + whistles(rise=.006)
    return close_reflections(car + background, share=0.39, slide=.0004)[None]


def record(dry):
    """Peaks are rounded, the top is cut, the ends fade without a click."""
    fade = np.clip(np.minimum(TIME, TIME[-1] - TIME) / .006, 0, 1)
    rounded = 1.109 * np.tanh(dry * fade / 1.069)
    return signal.sosfilt(signal.cheby2(12, 70, CUTOFF_HZ, fs=SR, output="sos"), rounded)


dry = scene()
out = record(dry)
unload_wav(out)
```